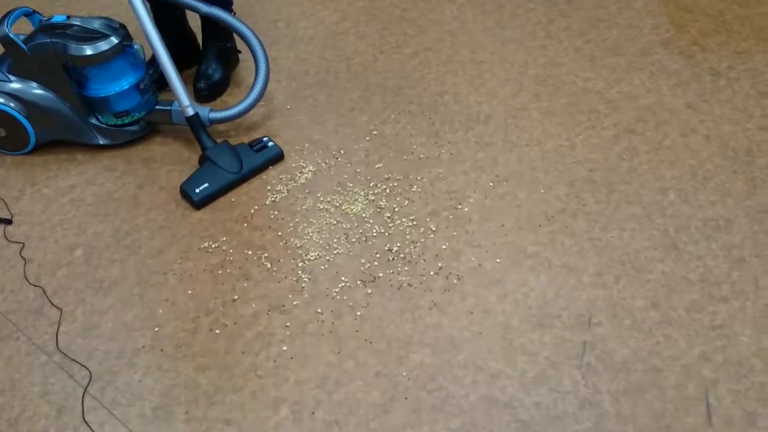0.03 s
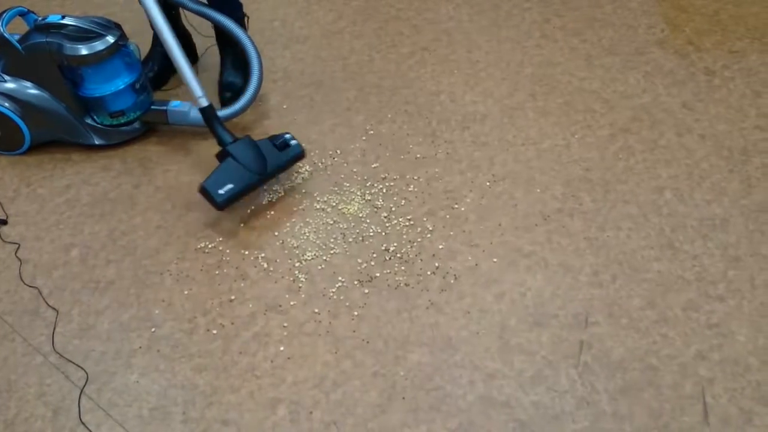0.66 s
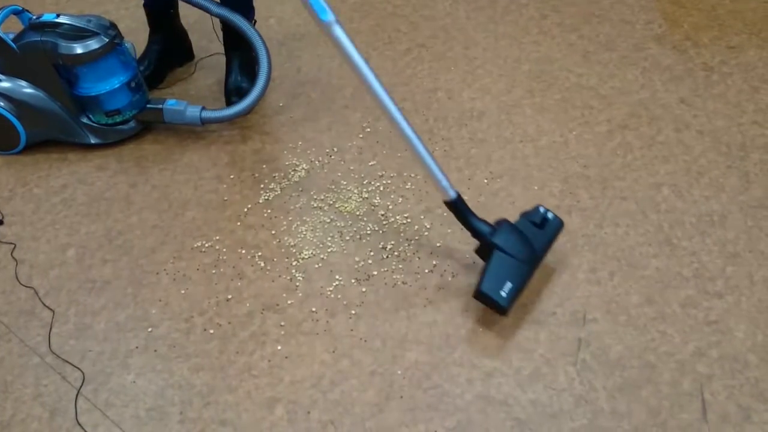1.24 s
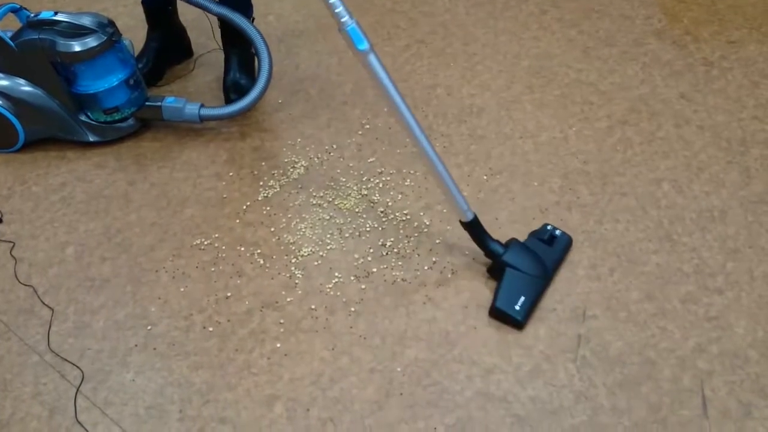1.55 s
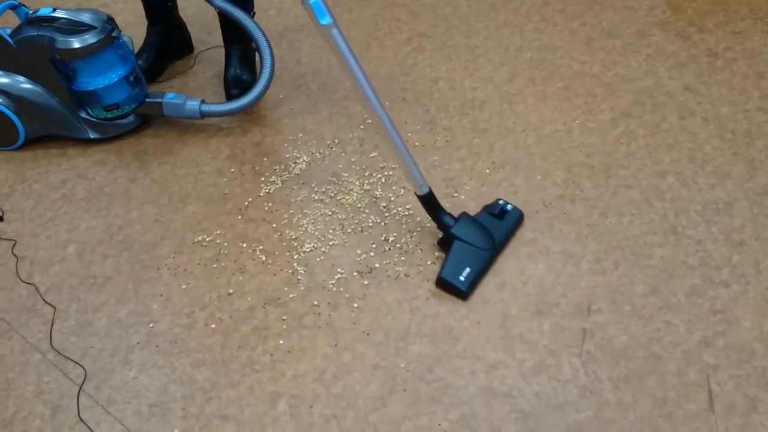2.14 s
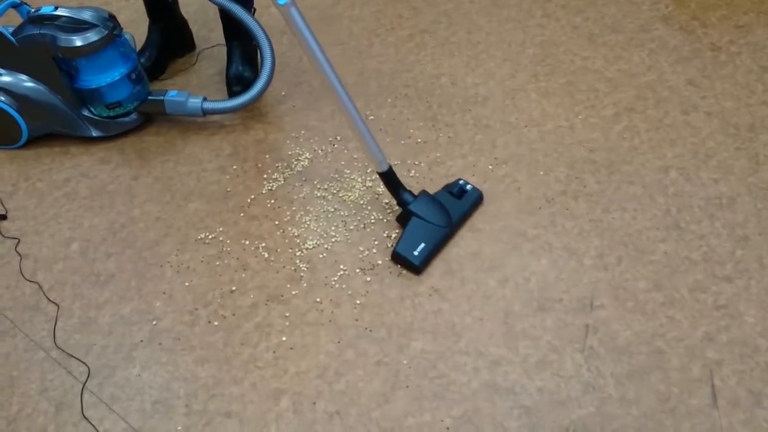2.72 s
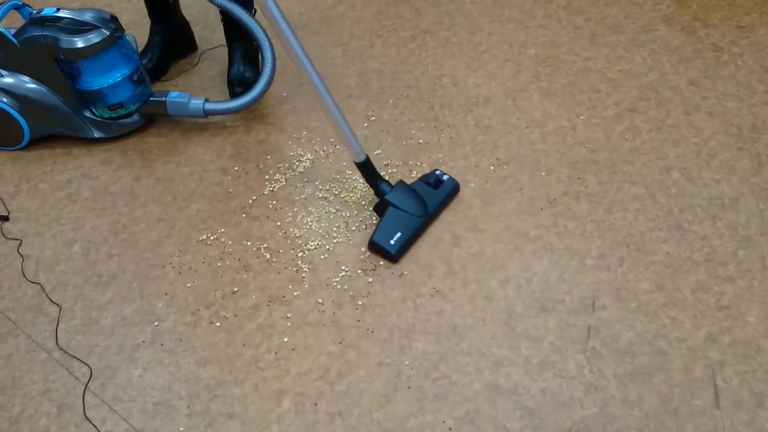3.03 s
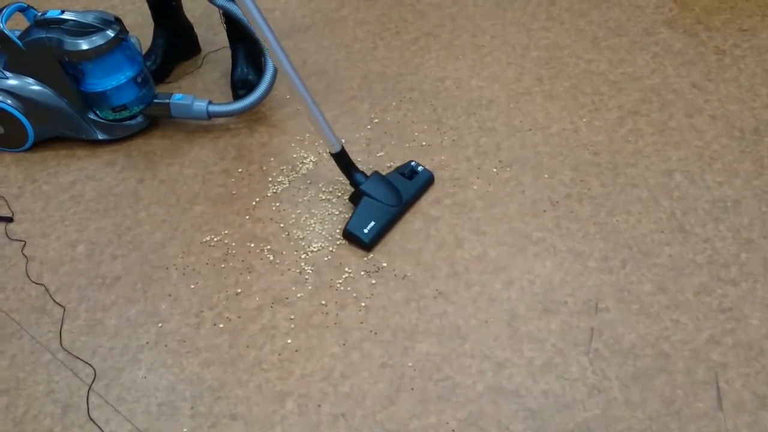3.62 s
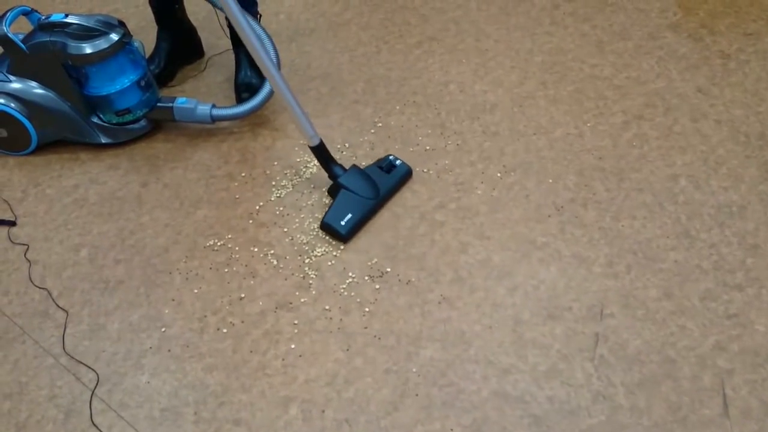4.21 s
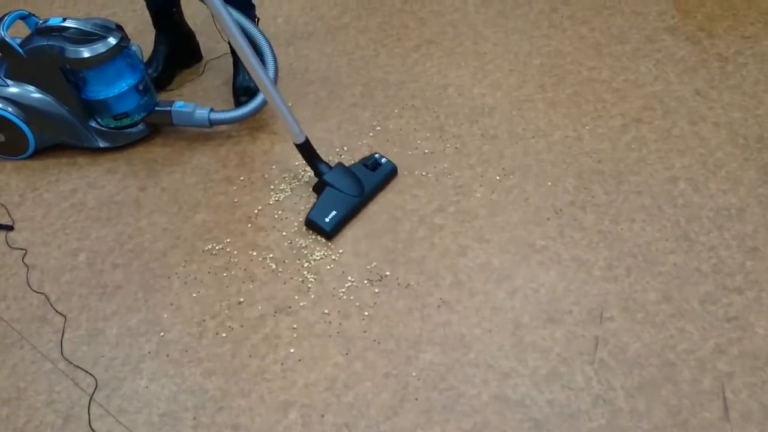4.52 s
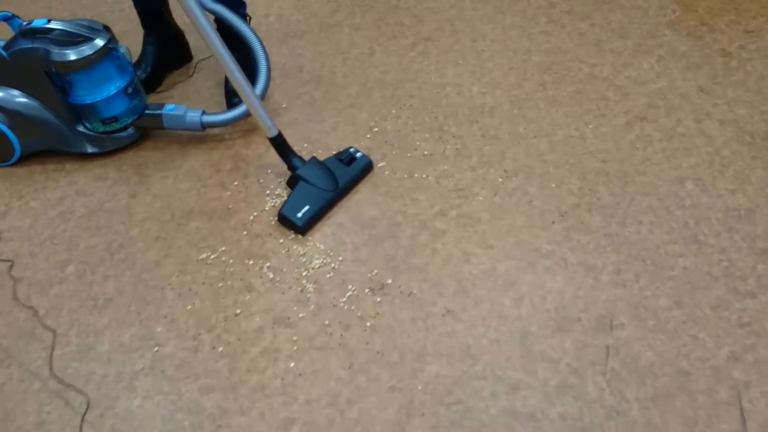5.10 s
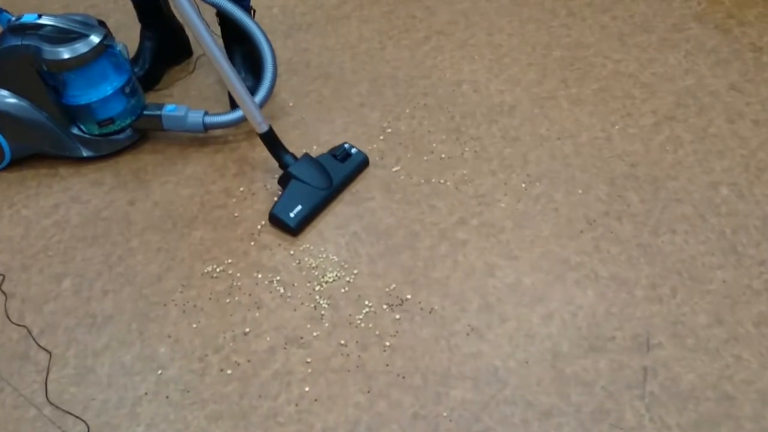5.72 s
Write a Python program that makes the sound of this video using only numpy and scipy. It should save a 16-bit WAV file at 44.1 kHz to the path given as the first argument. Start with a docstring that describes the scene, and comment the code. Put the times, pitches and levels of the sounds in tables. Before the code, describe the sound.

A canister vacuum cleaner spins up to a loud roar and hiss, then sucks up scattered grains that rattle densely up its tube.

```python
"""In a room, a canister vacuum cleaner starts with two faint ticks and spins up: the tones of shaft
and fan blades climb with the rotation, while turbulent air swells into a roar and hiss shaped by cavity
and duct resonances. A few lone grains crack against the tube and excite its modes. Then the floor brush
is drawn through a heap: a stream of grains rattles up the tube as a dense train of random impacts,
and meanwhile the machine's steady roar and hum sink and thin."""
import sys
import numpy as np
from scipy import signal
from scipy.fft import rfft, irfft
from scipy.io import wavfile

SR = 44100
rng = np.random.default_rng(int(sys.argv[2]) if len(sys.argv) > 2 else 0)


def store_pcm(level_fs):
    """Save levels as 16-bit WAV."""
    pcm = np.round(np.clip(level_fs, -1, 1) * 32767).astype(np.int16)
    wavfile.write(sys.argv[1], SR, np.atleast_2d(pcm).T)


N = 262836
TIME = np.arange(N) / SR
TOP_HZ, BLADES = 550.9, 12  # limiting rotation rate of the shaft; blades on the fan
HEAP_S = 2.49  # the brush reaches the heap


def amp(db):
    """Decibels to amplitude ratio."""
    return 10 ** (np.asarray(db) / 20)

def unit_rms(x):
    """Normalisation to rms 1."""
    return x / np.sqrt(np.mean(x ** 2) + 1e-20)

def curve(rows):
    """Linear interpolation of (t, value) rows."""
    return np.interp(TIME, *np.transpose(rows))

def bell(x, centre, sigma):
    """Gaussian of height 1."""
    return np.exp(-.5 * ((x - centre) / sigma) ** 2)

def resonance_db(hz, peaks):
    """Sum of Lorentzian peaks, each (f/Hz, bandwidth/Hz, gain/dB)."""
    return sum(db / (1 + (2 * (hz - f) / width) ** 2) for f, width, db in peaks)

def add(mix, s, sound):
    """Superposition of a sound starting at s seconds."""
    part = mix[max(round(s * SR), 0):][:len(sound)]
    part += sound[:len(part)]

def wander(rate_hz):
    """Random fluctuation: low-pass noise of rms 1."""
    hz = np.fft.rfftfreq(N, 1 / SR)
    return unit_rms(irfft(rfft(rng.standard_normal(N)) / (1 + (hz / rate_hz) ** 4), N))

def narrowband(hz, half_width_hz):
    """Narrow-band noise: a carrier with a random complex envelope."""
    envelope = wander(half_width_hz) + 1j * wander(half_width_hz)
    return (envelope * np.exp(2j * np.pi * hz * TIME)).real

def blurred(angle, depth, width_hz):
    """Spectral broadening: turbulence modulates a tone's amplitude and phase at constant mean power."""
    flutter = depth * (wander(width_hz) + 1j * wander(width_hz)) / np.sqrt(2)
    return ((1 + flutter) * np.exp(1j * angle)).imag / np.hypot(1, depth)

def colour(x, spectrum, peaks=()):
    """Minimum-phase filter of unit power gain, from (f/Hz, level/dB) points and resonances."""
    hz = abs(np.fft.fftfreq(8192, 1 / SR))
    points_hz, points_db = np.transpose(spectrum)
    db = np.interp(np.log(hz + 1), np.log(points_hz), points_db) + resonance_db(hz, peaks)
    response = np.exp(np.conj(signal.hilbert(np.log(amp(db)))))
    taps = np.fft.ifft(response).real[:len(hz) // 2]
    return signal.oaconvolve(x, taps / np.linalg.norm(taps))[:N]

def hail(per_s, spread_db, t60):
    """Shot noise: grains of uneven size strike at random, each a decaying burst of noise."""
    size = amp(spread_db * np.minimum(rng.exponential(1, N), 4)) * (rng.random(N) < per_s / SR)
    power = signal.lfilter([1], [1, -amp(-60 / (t60 * SR)) ** 2], size ** 2)
    return unit_rms(np.sqrt(power) * rng.standard_normal(N))

def shaft_hz(head_start_s=.3986, run_up_s=1.1005, bend=1.5665):
    """Run-up transient: the rotation rate follows an S-curve toward top speed."""
    return TOP_HZ * (1 - np.exp(-((TIME + head_start_s) / run_up_s) ** bend))

def lag():
    """Speed deficit as a fraction of top speed."""
    return 1 - shaft_hz() / TOP_HZ

def air_onset(before_db, catch_s=0.21, rise_s=0.052):
    """Onset of flow: the gain rises to 1 as the fan catches the air."""
    return amp(before_db * np.clip((catch_s - TIME) / rise_s + .5, 0, 1))

# Sinking of the steady roar and hum while the grains rattle: t/s, depth (0 none, 1 full)
HUSH_DEPTH = [(2.42, 0.022), (2.85, 0.33), (3.4, 0.61), (4, 0.63), (4.6, 0.75), (4.9, 0.61), (5.3, 0.63),
              (5.8, 0.49)]
def hush():
    """Attenuation envelope: how far the steady sounds have sunk and thinned."""
    return curve(HUSH_DEPTH)

# The brush is lifted over to the heap: t/s, lift (0 on the floor, 1 in the air)
BRUSH_LIFT = [(.7, 0.48), (.78, 1), (1.04, 0.63), (1.33, 0.11)]
def lift():
    """Clearance of the intake over time."""
    return curve(BRUSH_LIFT)

# Critical speeds of the shaft: f/Hz, bandwidth/Hz, gain/dB
CRITICAL_SPEEDS = [(295, 26, 8), (337, 26, 9), (486, 24, 10.5), (512, 12, 3), (531, 8, 5),
                   (546.6, 2.2, 5.5)]
def shake_db():
    """Sympathetic vibration grows as the shaft passes a critical speed."""
    return resonance_db(shaft_hz(), CRITICAL_SPEEDS)

def rumble(level_db=-52, hush_db=-9):
    """Ambient noise: the faint low floor of the room."""
    noise = colour(rng.standard_normal(N), [(20, 26), (55, -11), (130, -13), (600, -64)])
    return noise * amp(level_db + hush_db * hush())

def casing(level_db=-38.5, throb_db=2, hush_db=-16, start_s=.14, rise_s=0.13):
    """Forced vibration: the plastic shell drones unevenly, louder once the motor turns."""
    spectrum = [(40, -49), (95, 6), (140, -0.5), (195, 12), (260, -10), (330, 2), (900, 4.5),
                (1200, -12), (4000, -52)]
    drone = colour(rng.standard_normal(N), spectrum)
    turning = np.clip((TIME - start_s) / rise_s + .5, .5, 1)
    return drone * turning * amp(level_db + throb_db * wander(3.1) + hush_db * hush())

# Handling thuds: t/s, level/dB, f/Hz, T60/s
THUDS = [(0.217, -14.5, 195, 0.08), (0.38, -14, 76.4, 0.077), (0.74, -29, 66, 0.13), (1.419, -36, 85, 0.17),
         (1.62, -34.5, 91, 0.16), (1.96, -43, 60, 0.16), (2.67, -32, 45, 0.17), (2.95, -31, 40, 0.088)]
def bumps(rise_s=0.017):
    """Damped oscillation: brush and hose thud softly, one low mode at a time."""
    out, t = np.zeros(N), np.arange(SR // 4) / SR
    for s, db, hz, t60 in THUDS:
        envelope = 2 * amp(db - 60 * t / t60) * (1 - np.exp(-t / rise_s))
        add(out, s, envelope * np.sin(2 * np.pi * hz * t))
    return out

# Edges of the brush landing on the floor: t/s, level/dB
LANDINGS = [(1.4005, -13.5), (1.4335, -9.5)]
def scuff(rise_s=0.0035):
    """Impact and friction: each edge lands with a hollow thud and a gritty scrape."""
    spectrum = [(60, -7), (130, 2.5), (260, -6), (700, 11), (1400, 3), (1950, 3.5), (3000, -14),
                (5000, -6), (7000, -16), (14000, -25)]
    grit = colour(hail(per_s=2900, spread_db=2, t60=0.0064), spectrum)
    envelope = np.zeros(N)
    for s, db in LANDINGS:
        age = np.maximum(TIME - s, 0) / rise_s
        envelope += amp(db) * age * np.exp(1 - age)
    return grit * envelope

def rasp(level_db=-41, fade_db_per_s=8, start_s=.126, rise_s=.008):
    """Starting transient: a dry rasp sets in as the motor takes hold and decays under the air."""
    spectrum = [(900, -26), (1400, 2), (2600, -17), (3500, -28), (5500, -10), (9000, -16), (14000, -28)]
    peaks = [(1790, 490, 15), (4400, 400, 5), (5450, 350, 4.7)]
    noise = colour(rng.standard_normal(N), spectrum, peaks)
    return noise * np.clip((TIME - start_s) / rise_s, .06, 1) * amp(level_db - fade_db_per_s * TIME)

# Hollow notes of the canister: f/Hz, half-width/Hz, level/dB
CANISTER_NOTES = [(519, 14.7, -43.5), (635, 50, -44.5)]
def hoot(slow_db=-40):
    """Helmholtz resonance: near full speed the airflow blows the canister like a bottle."""
    notes = sum(amp(db) * narrowband(hz, width) for hz, width, db in CANISTER_NOTES)
    return notes * amp(slow_db * lag())

# Airway whistles: f/Hz, half-width/Hz, level/dB, loudest shaft rate/Hz, spread of that rate/Hz
AIRWAY_MODES = [(3200, 450, -43, 345, 55), (3500, 130, -34.5, 424, 32), (4480, 160, -42, 345, 70),
                (5600, 230, -56, 200, 45), (9450, 280, -61, 200, 50), (12900, 600, -64, 230, 70),
                (12100, 300, -50, 435, 36), (13100, 280, -50, 425, 70)]
def whistle():
    """Flow-excited resonance: each airway speaks over its own range of fan speeds, then drops out."""
    out, speed = np.zeros(N), shaft_hz()
    for hz, width, db, best, spread in AIRWAY_MODES:
        out += amp(db) * bell(speed, best, spread) * narrowband(hz, width)
    return out * air_onset(before_db=-20)

# Mains harmonics in the motor: f/Hz, level/dB
MAINS_HARMONICS = [(100, -58.5), (200, -44.5), (300, -47.5), (400, -49.5), (600, -50.5), (900, -60)]
def mains_buzz(hush_db=-20, flicker_db=3.5):
    """Harmonics locked to the mains keep their pitch at any shaft speed."""
    buzz = sum(amp(db + flicker_db * wander(10)) * np.sin(2 * np.pi * (hz * TIME + rng.random()))
               for hz, db in MAINS_HARMONICS)
    return buzz * amp(hush_db * hush())

# Duct resonances crossed by the blade tone: f/Hz, bandwidth/Hz, gain/dB
BLADE_RESONANCES = [(4950, 350, 6.5), (5660, 240, 8), (6300, 250, 1)]
# Clean blade tone, faint through the middle of the rattle: t/s, level/dB
BLADE_LEVEL = [(0, -100), (1.5, -56), (1.72, -44), (1.95, -46), (2.1, -38), (2.36, -31.5), (2.5, -38),
               (2.65, -28), (2.85, -37), (3.05, -35), (3.3, -49), (5.35, -50), (5.6, -35), (5.9, -30.5)]
def whine(angle, breath_db=-42, hush_db=-5, slow_db=-3):
    """Blade-passing tone: a thin note in a breathy band that swells at each duct resonance."""
    ringing_db = resonance_db(BLADES * shaft_hz(), BLADE_RESONANCES)
    db = breath_db + ringing_db + hush_db * hush() + slow_db * (4 * lag()) ** 2
    breath = blurred(BLADES * angle, depth=3, width_hz=70)
    note = blurred(BLADES * angle, depth=.3, width_hz=25)
    return amp(db) * breath + amp(curve(BLADE_LEVEL)) * note

# Brief dips of the shaft note: t/s, gain/dB, half-length/s
SHAFT_DIPS = [(1.65, -0.5, 0.025), (2.24, -12, 0.028), (4.55, -5.5, .18), (5.22, -9, 0.039)]
def shaft(angle, strain, level_db=-27, slow_db=-27, hush_db=-5.5, fade_db_per_s=2, lifted_db=-3):
    """Rotating unbalance: a note at the shaft rate, harsh under strain, sinking during the rattle."""
    sinking_db = hush_db * hush() - fade_db_per_s * np.maximum(TIME - HEAP_S, 0)
    dips_db = sum(db * bell(TIME, s, width) for s, db, width in SHAFT_DIPS)
    throb_db = wander(28)
    db = level_db + slow_db * lag() + sinking_db + shake_db() + dips_db + throb_db
    fundamental = blurred(angle, depth=.3 + .15 * strain + .4 * hush(), width_hz=30)
    overtones = amp(-14.5 + 13 * strain) * (np.sin(2 * angle) + .5 * np.sin(3 * angle))
    return amp(db) * air_onset(before_db=-6) * (amp(lifted_db * lift()) * fundamental + overtones)

def motor(jitter_hz=0.33, shudder_hz=9):
    """Frequency modulation: shaft and blades share one jittery rotation; strain shakes the shaft note."""
    strain = np.minimum(4 * lag(), 1)
    angle = 2 * np.pi * np.cumsum(shaft_hz() + jitter_hz * wander(30.26)) / SR
    shudder = 2 * np.pi * np.cumsum(shudder_hz * strain * wander(30.2)) / SR
    buzz = mains_buzz()
    return np.sqrt(2) * (shaft(angle + shudder, strain) + whine(angle) + buzz)

def spun_up(x, tilt_db, rest_hz, shaft_multiple, width_hz, band_db=3.5):
    """Flow noise brightens with speed: the treble opens and a breathy band climbs with the fan."""
    hz, t, spectra = signal.stft(x, SR, nperseg=1024)
    speed, hz = np.interp(t, TIME, shaft_hz()), hz[:, None]
    tilt = tilt_db * (1 - speed / speed.max()) * np.log2((hz + 300) / 1000)
    band = resonance_db(hz, [(rest_hz + shaft_multiple * speed, width_hz, band_db)])
    return signal.istft(spectra * amp(tilt + band), SR)[1][:N]

def floor_bounce(x, reflection=.33, cutoff_hz=8000, heap_delay_ms=0.906, shrink_ms_per_s=0.047):
    """Comb filtering: a dull floor echo interferes; its delay shrinks as the brush is drawn back."""
    echo = signal.filtfilt(*signal.butter(2, cutoff_hz, fs=SR), x)
    delay_s = (heap_delay_ms - shrink_ms_per_s * (TIME - HEAP_S)) / 1000
    return x + reflection * np.interp(TIME - delay_s, TIME, echo)

# Spectrum of the duct flow: f/Hz, level/dB
HISS_SPECTRUM = [(700, -23.5), (1150, -18.5), (1800, -2.5), (2300, -5.5), (3200, 0.5), (4400, 1.5),
                 (5400, -1.5), (6400, -1.5), (7200, -2), (8300, -4), (9500, -10), (12000, -13),
                 (14200, -12)]
# Exhaust duct resonances: f/Hz, bandwidth/Hz, gain/dB
DUCT_MODES = [(1880, 420, 7), (2495, 500, 6), (3440, 240, -1.5), (3970, 990, -2), (4970, 130, 0),
              (5630, 440, 2.5), (6260, 250, -0.5), (6640, 400, 3)]
def hiss(level_db=-22, slow_db=-36, hush_db=-4, flutter_db=1.15, hollow_hz=3600):
    """Turbulent duct flow: the hiss comes up early and hollows slightly at full speed."""
    noise = colour(rng.standard_normal(N), HISS_SPECTRUM, DUCT_MODES)
    noise = spun_up(noise, tilt_db=-7, rest_hz=3000, shaft_multiple=4.3, width_hz=650)
    band = signal.lfilter(*signal.iirpeak(hollow_hz, 3.5, fs=SR), noise)
    hollowed = noise - band * (1 - amp(-1)) * np.exp(-lag() / 0.23)
    db = level_db + slow_db * lag() ** 2.83 + hush_db * hush() + flutter_db * wander(15.4)
    air = hollowed * air_onset(before_db=-6) * amp(db)
    # while the grains rattle, the hiss takes on some of the same floor echo
    return air + hush() * (floor_bounce(air) - air)

# Spectrum of the intake turbulence: f/Hz, level/dB
ROAR_SPECTRUM = [(25, -42), (70, -33), (130, -41.5), (200, -6), (260, -5), (400, -2.5), (520, 1.5),
                 (700, 5), (950, 1.5), (1300, -2.5), (1600, -2.5), (2100, -4), (3200, -22.5), (8000, -49)]
# Resonances of brush and canister: f/Hz, bandwidth/Hz, gain/dB
CAVITY_MODES = [(312.6, 24, 5), (421, 30, 7.5), (498, 31, 6), (610, 41, 3), (885, 20, 4.5), (1000, 22, 1),
                (1281, 68, 6.5)]
# Surges as the brush is set down and pushed: t/s, gain/dB
ROAR_SURGE = [(.55, 3), (.65, 0), (1, -0.5), (1.26, -0.5), (1.38, -0.5), (1.5, -1.5), (1.62, -1.5),
              (1.73, 0), (2.08, -1), (2.22, -0.5), (2.36, -0.5), (2.6, .5), (2.8, -1.5)]
def roar(level_db=-18.5, slow_db=-37, hush_db=-23, lifted_db=-1.5, gust_db=1.34):
    """Turbulence excites cavity resonances; it swells with fan speed and sinks while the grains rattle."""
    noise = colour(rng.standard_normal(N), ROAR_SPECTRUM, CAVITY_MODES)
    noise = spun_up(noise, tilt_db=-12.5, rest_hz=60, shaft_multiple=2, width_hz=470)
    run_up_db = slow_db * lag() ** 1.38 + 0.5 * shake_db() * lag()
    handling_db = lifted_db * lift() + curve(ROAR_SURGE)
    return noise * amp(level_db + run_up_db + handling_db + hush_db * hush() + gust_db * wander(15))

# Modes of the tube wall: f/Hz, level/dB, T60/s
TUBE_MODES = [(750, -13, .007), (2150, -3, 0.01), (2970, -5, 0.0046), (3430, 7.5, 0.0049),
              (4070, 9, 0.0054), (4660, 1, .004), (6220, -1, 0.0048), (6600, 6, 0.0062),
              (8860, -17, 0.0076), (10760, -8, 0.0052)]
# Two switch-on clicks, then lone grains: t/s, level/dB, gain of the top modes/dB, gain of the snap/dB
CLICKS_AND_CRACKS = [(0.273, -29, 1, 0), (0.378, -26, -10, -4), (0.748, 1.5, 4.5, 5.5),
                     (0.7634, -1.5, -2, -3), (0.8267, -1, 2.5, 5), (0.8355, 0, -3, -5),
                     (0.838, -11, -12, -3), (0.9418, -1, -2, -1), (1.195, -8.5, 3.5, 7),
                     (1.2232, -8, -4, -3), (1.2365, -20, 0, 7)]
def clicks_and_cracks(top_hz=5500, rise_s=0.0008, snap_t60=0.0041):
    """Impulse excitation of modes: two faint ticks as the motor starts, then lone grains on the tube."""
    out, t = np.zeros(N), np.arange(SR // 40) / SR
    for s, level_db, top_db, snap_db in CLICKS_AND_CRACKS:
        ring = np.zeros(len(t))
        for hz, db, t60 in TUBE_MODES:
            decay = amp(db + top_db * (hz > top_hz) - 60 * t / t60)
            ring += decay * np.sin(2 * np.pi * hz * rng.uniform(0.914, 1.01) * t)
        bright_noise = signal.lfilter([1, -1], [1, -.6], rng.standard_normal(len(t)))
        snap = bright_noise * amp(snap_db - 60 * t / snap_t60)
        add(out, s, amp(level_db) * (ring + snap) * (1 - np.exp(-t / rise_s)))
    return out

# Momentary changes in the stream, mostly brief stalls: t/s, gain/dB
STREAM_STALLS = [(2.78, -3), (3.03, 0), (3.655, -1), (3.912, -4), (4.012, -8), (4.118, -8), (4.71, -2.5),
                 (5.295, -5.5), (5.69, -4), (5.815, 1)]
# Clumps of grains swallowed at once: t/s, level/dB, half-length/s
GRAIN_CLUMPS = [(2.38, -9.5, 0.024), (2.451, -9, 0.0094), (2.545, -8.5, 0.027), (2.635, -4, 0.012),
                (2.694, -2, 0.025), (2.907, -6, 0.0071), (2.962, 0, 0.0093), (3.093, -2.5, 0.0086),
                (3.145, -6, 0.012), (3.197, -1, 0.018), (3.287, -3, 0.019), (3.38, -11, 0.01),
                (3.47, -3, 0.0061), (3.56, -5.5, 0.023), (3.71, -3, 0.01), (3.84, -3, 0.02),
                (3.964, -1.5, 0.0091), (4.077, -4, 0.0073), (4.161, -5, 0.038), (4.25, -5.5, 0.012),
                (4.312, -5, 0.022), (4.4, -3, 0.025), (4.52, -5, 0.015), (4.644, -6, 0.022),
                (4.755, -6.5, 0.01), (4.79, -4, 0.008), (4.893, -5, 0.037), (5.128, -4, 0.017),
                (5.175, -7, 0.011), (5.341, -6, 0.011), (5.636, -6, 0.026), (5.7674, -5.5, 0.013),
                (5.904, -3, 0.016), (5.95, -12, 0.01)]
def grain_flow(trickle_db=-20, growth_db_per_s=0.53, entry_s=0.42, stall_s=0.013, clump_db=-13):
    """Incoherent sources add in power: the stream's amplitude from an uneven trickle plus clumps."""
    since = TIME - HEAP_S
    stalls_db = sum(db * bell(TIME, s, stall_s) for s, db in STREAM_STALLS)
    level_db = trickle_db + growth_db_per_s * since + stalls_db + 0.8 * wander(2.5)
    trickle = amp(level_db) ** 2 * np.clip(since / entry_s, 0, 1)
    clumps = sum(amp(db + clump_db) ** 2 * bell(TIME, s, width) for s, db, width in GRAIN_CLUMPS)
    return np.sqrt(trickle + clumps)

def neck(x, start_hz=4380, end_hz=4950, glide_s=1.7, width_hz=380, ring_db=-9):
    """Gliding resonance: the neck of the brush rings higher as the tube is drawn upright."""
    hz = end_hz + (start_hz - end_hz) * np.exp(-np.maximum(TIME - HEAP_S, 0) / glide_s)
    carrier = np.exp(2j * np.pi * np.cumsum(hz) / SR)
    pole = np.exp(-np.pi * width_hz / SR)
    ring = 2 * (carrier * signal.lfilter([1 - pole], [1, -pole], x / carrier)).real
    return x + amp(ring_db) * ring

# Spectra of grains in the tube and on the brush: f/Hz, level/dB
RATTLE_SPECTRUM = [(200, -29), (900, -29), (1150, -23), (1400, -5), (2350, -2), (3100, -2), (4900, -1),
                   (6200, 2.5), (7300, -7.5), (10000, -11), (14200, -14.5)]
TICK_SPECTRUM = [(1000, -72), (4000, -6.5), (7500, 4.5), (9500, 0.5), (11500, 0.5), (12900, 1),
                 (14200, 0.5)]
# Resonances of the tube's air column and of the brush shell: f/Hz, bandwidth/Hz, gain/dB
AIR_COLUMN_MODES = [(1380, 140, 2.5), (1920, 250, 4.5), (2390, 240, 1.9), (4180, 240, 1.5),
                    (5900, 450, 0.5)]
SHELL_MODES = [(7600, 450, 1.5), (9650, 530, 4), (11000, 700, 2.5), (12800, 700, 2.5)]
def stream(rattle_db=-1.56, ticks_db=-2.5, dulling_db_per_s=1, bunching_db=0.48):
    """Filtered shot noise: grains rattle hollowly up the tube; fewer tick brightly on the brush."""
    rattle = neck(colour(hail(per_s=2800, spread_db=3.5, t60=0.0037), RATTLE_SPECTRUM, AIR_COLUMN_MODES))
    ticks = colour(hail(per_s=1200, spread_db=3.4, t60=0.006), TICK_SPECTRUM, SHELL_MODES)
    mix = amp(rattle_db) * rattle + amp(ticks_db - dulling_db_per_s * (TIME - HEAP_S)) * ticks
    return grain_flow() * mix * amp(bunching_db * wander(79))

def tick(t60):
    """Damped impact of one grain on plastic: a noise burst of peak 1."""
    t = np.arange(400) / SR
    burst = rng.standard_normal(len(t)) * amp(-60 * t / t60)
    return burst / abs(burst).max()

# Large grains in the brush: t/s, hollow level/dB, bright level/dB
LARGE_GRAINS = [(2.362, -2, -11), (2.384, 0, 2), (2.434, -9, -1), (2.513, -16, 1), (2.554, -1, 4),
                (2.6114, -6, 0), (2.6712, -5, 4), (2.686, 3.5, -8), (2.884, -14, 1), (2.9406, -3, 2),
                (3.0782, -1, -7), (3.126, 3, -7), (3.3518, -9, -1), (3.698, -4, 3), (3.925, -8, -3),
                (3.944, -9, -4), (4.0546, -2, -1.5), (4.233, -1.5, -13), (4.321, -12.5, -5),
                (4.774, -12, 0), (4.9018, -9, 3), (4.982, 2, -1), (5.099, -13, 5), (5.726, -17, 5),
                (5.7574, -16, -8), (5.8886, -10, 2), (5.905, -15, 2)]
def knocks(rattle_db=-1, ticks_db=-2):
    """Single impacts stand out of the stream, exciting both the air column and the brush shell."""
    hollow, bright = np.zeros((2, N))
    for s, hollow_db, bright_db in LARGE_GRAINS:
        add(hollow, s, amp(hollow_db) * tick(t60=.005))
        add(bright, s, amp(bright_db) * tick(t60=.003))
    return (amp(rattle_db) * colour(hollow, RATTLE_SPECTRUM, AIR_COLUMN_MODES)
            + amp(ticks_db) * colour(bright, TICK_SPECTRUM, SHELL_MODES))

def room(x, t60=0.15, wet_db=-17):
    """Reverberation: the walls add a short, weak, exponentially decaying tail."""
    t = np.arange(SR // 2) / SR
    tail = rng.standard_normal(len(t)) * amp(-60 * t / t60) * (t > .004)
    return x + amp(wet_db) * signal.oaconvolve(x, tail / np.linalg.norm(tail))[:N]

def bass_loss(x, full_hz=12, thin_hz=372, deep_db=-3, deep_hz=40):
    """High-pass filtering: the bass thins out while the grains rattle; a little deep rumble stays."""
    hz, t, spectra = signal.stft(x, SR, nperseg=2048)
    thinning = np.tanh(2.36 * np.interp(t, TIME, hush()) ** 1.41)
    cutoff_hz = full_hz + (thin_hz - full_hz) * thinning
    ratio = (hz[:, None] / cutoff_hz) ** 12
    deep = amp(deep_db) / (1 + (hz[:, None] / deep_hz) ** 2.14)
    return signal.istft(spectra * np.maximum(ratio / np.hypot(1, ratio), deep), SR)[1][:N]

def scene():
    """Superposition of the machine, the grains and the handling, in one channel."""
    impacts = room(floor_bounce(stream() + knocks()) + scuff()) + clicks_and_cracks()
    air = hiss()
    drone = casing() + rumble()
    return (motor() + rasp() + roar() + hoot() + air + whistle() + drone + impacts + bumps())[None]

def record(dry, cutoff_hz=14150):
    """Saturation: the loudest cracks overload the microphone; bass loss and a band limit follow."""
    clipped = dry[0] / (1 + dry[0] ** 8) ** (1 / 8)
    low_pass = signal.firwin(801, cutoff_hz, window=("kaiser", 9), fs=SR)
    return signal.oaconvolve(bass_loss(clipped), low_pass, "same")[None]


dry = scene()
out = record(dry)
store_pcm(out)
```